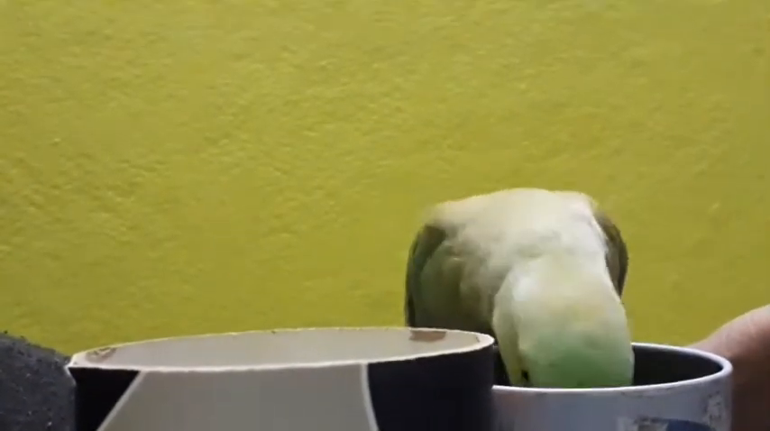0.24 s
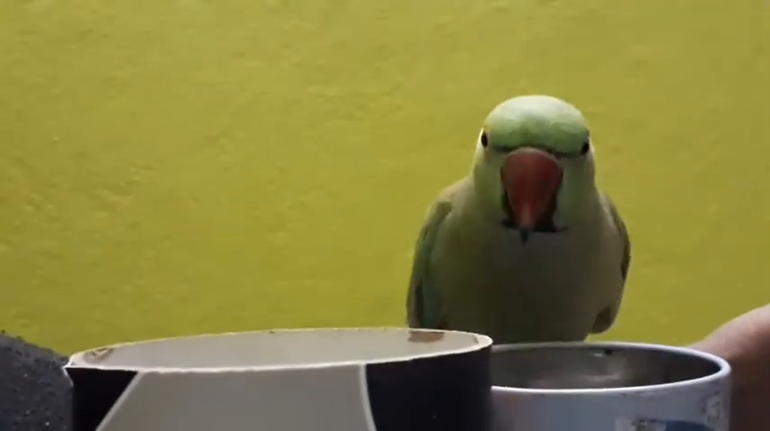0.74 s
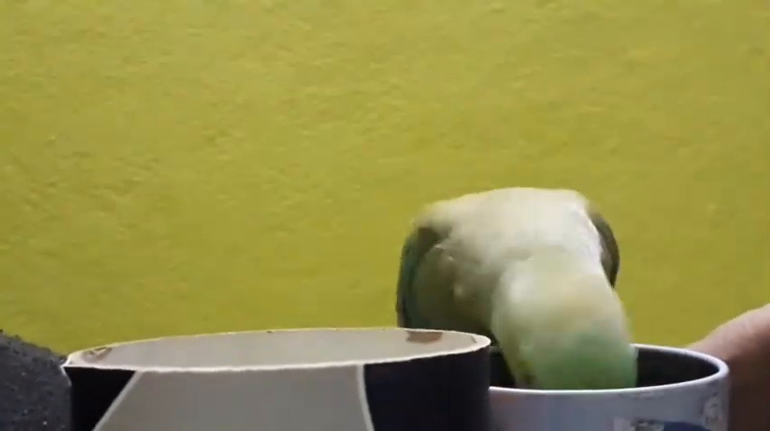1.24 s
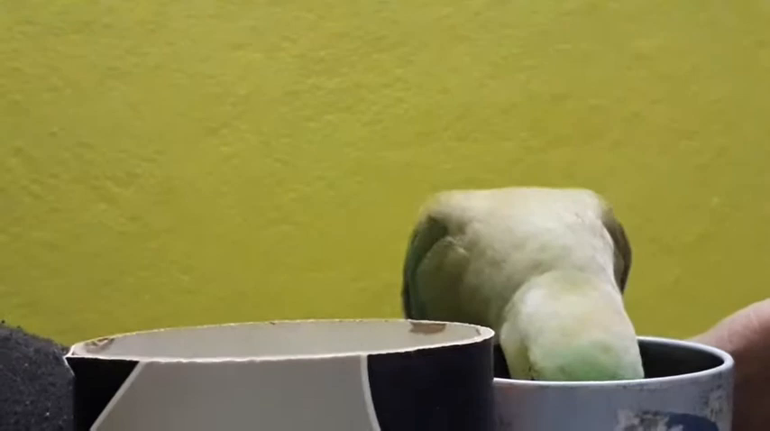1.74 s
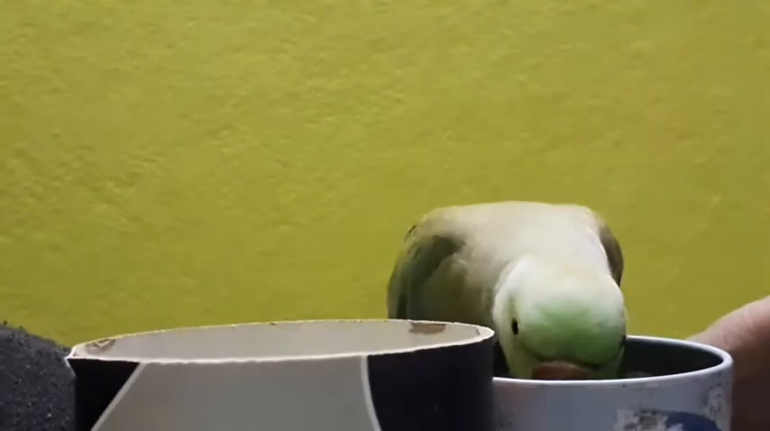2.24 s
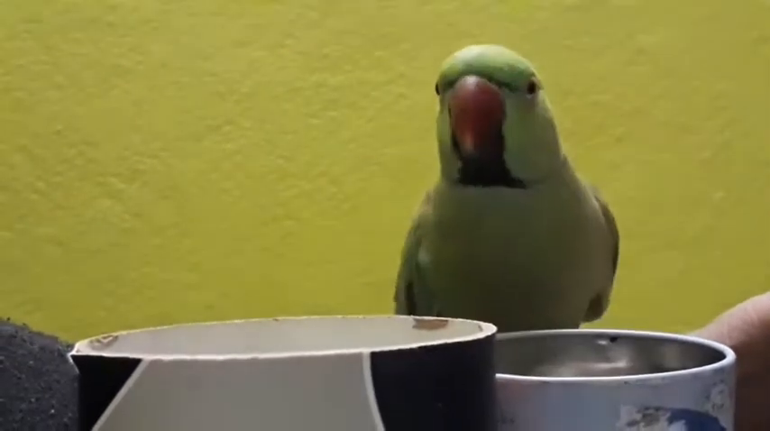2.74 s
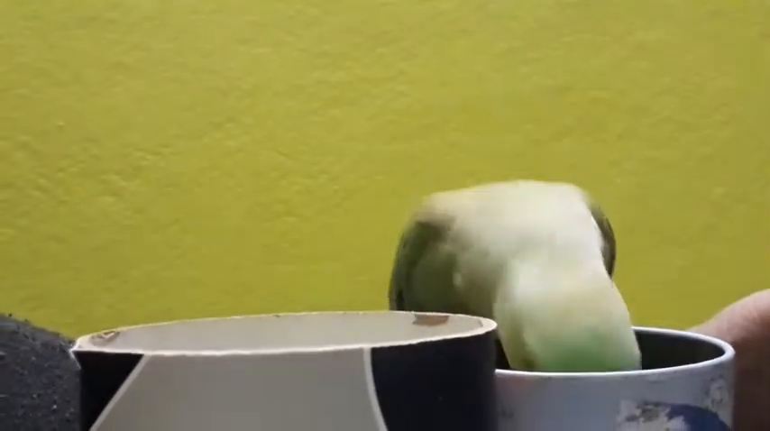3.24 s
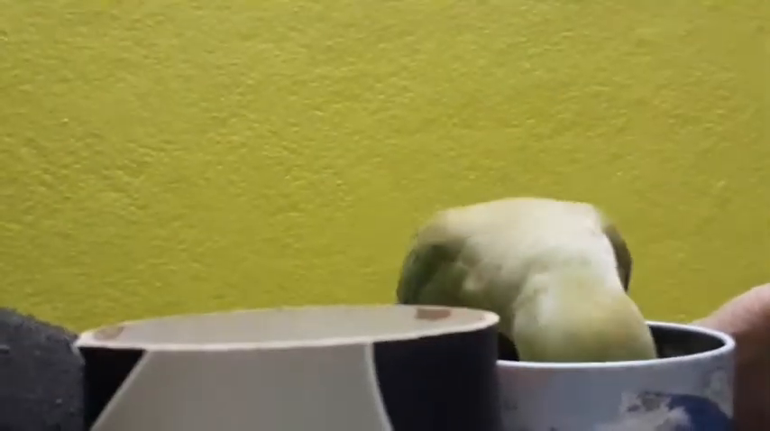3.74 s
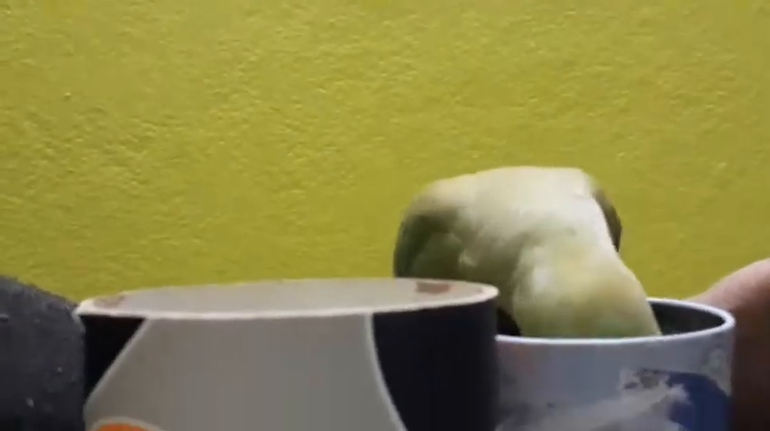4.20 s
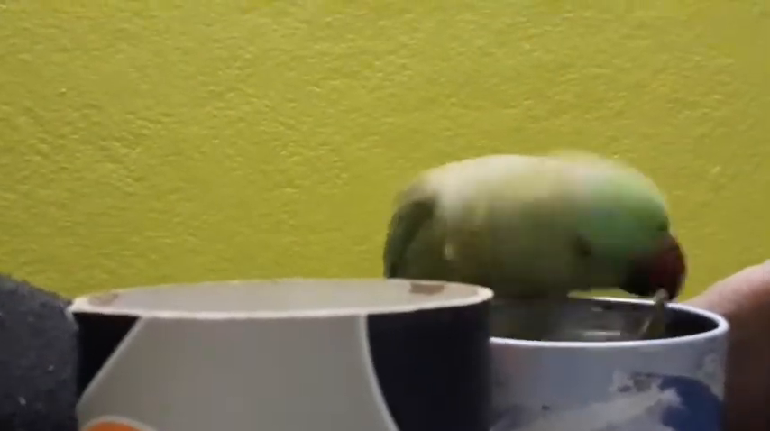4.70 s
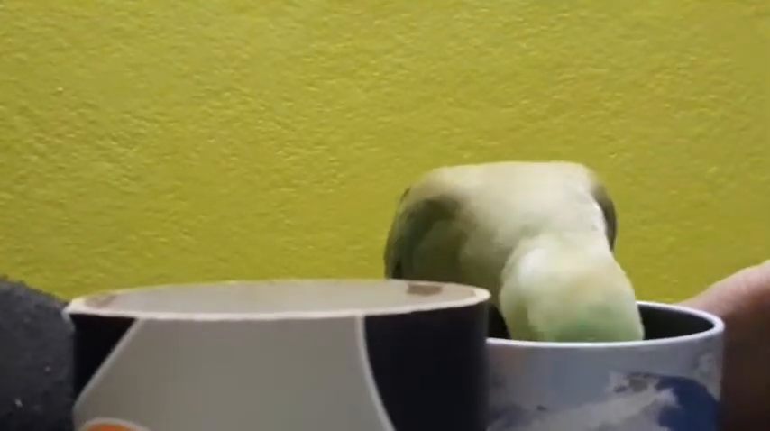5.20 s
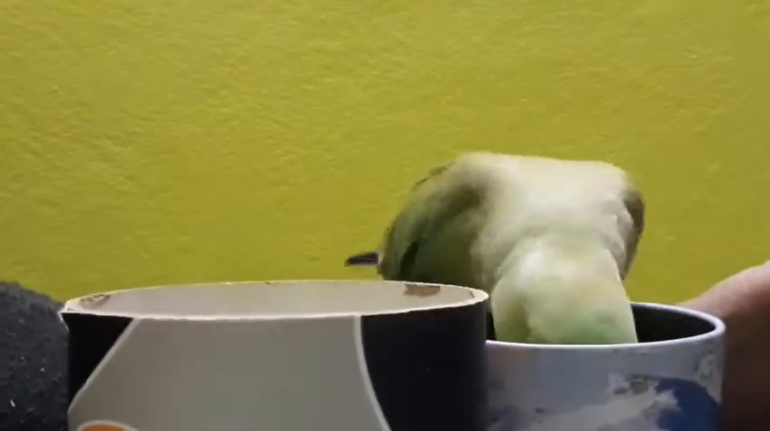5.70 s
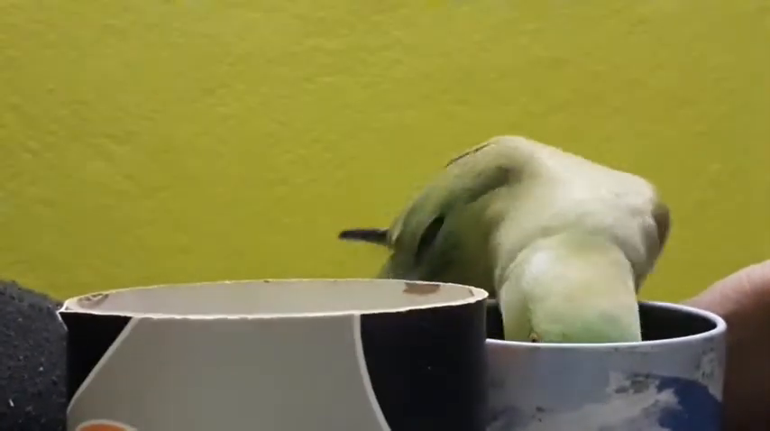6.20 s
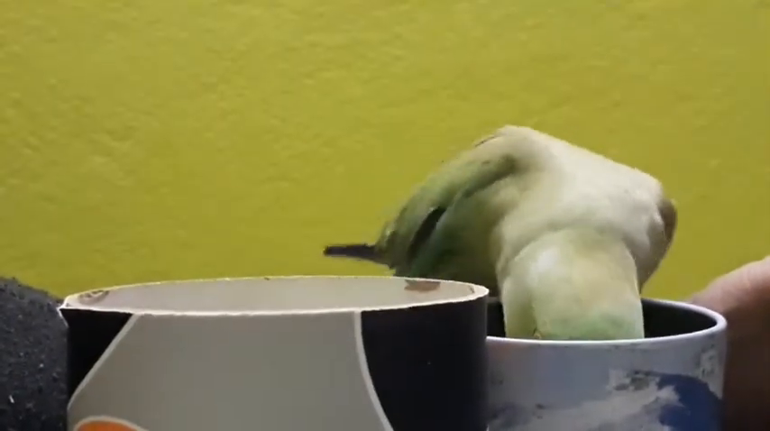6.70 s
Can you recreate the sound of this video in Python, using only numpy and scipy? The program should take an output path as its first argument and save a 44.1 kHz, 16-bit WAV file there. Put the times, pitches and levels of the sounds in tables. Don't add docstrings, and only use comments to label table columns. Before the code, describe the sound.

Coins clink, drag and jingle in a metal mug as a bird's beak digs, close up in a small hard room with distant traffic.

```python
import sys
import numpy as np
from scipy import signal
from scipy.fft import rfft, irfft
from scipy.io import wavfile
from scipy.ndimage import uniform_filter1d

SR = 44100
rng = np.random.default_rng(int(sys.argv[2]) if len(sys.argv) > 2 else 0)


def level_to_linear(level):
    exponent = np.asarray(level, float) / 20
    return 10 ** exponent


def pcm_store(signal):
    levels = np.round(np.clip(np.atleast_2d(signal), -1, 1) * 32767)
    wavfile.write(sys.argv[1], SR, levels.astype(np.int16).T)


N = 306495
T = np.arange(N) / SR
RIM_HZ = 6680
HEAD_IN_S = 4.3
# mode_hz, width_hz, level_db
MUG_MODES = [(920, 31, 11.5), (1922, 76, -8), (2730, 47, -14), (3750, 220, -1.5), (4640, 110, -7.5),
             (6050, 130, -20)]


def band(x, lo_hz, hi_hz, order=2):
    return signal.sosfilt(signal.butter(order, [lo_hz, min(hi_hz, .45 * SR)], "band", fs=SR, output="sos"), x)


def resonate(x, hz, width_hz):
    return signal.lfilter(*signal.iirpeak(hz, hz / width_hz, fs=SR), x)


def unit(x):
    return x / np.sqrt(np.mean(x ** 2))


def curves(table, silent_db=None):
    s, *columns = np.transpose(table)
    return [np.interp(T, s, c, silent_db, silent_db) for c in columns]


def walk(rate_hz):
    k = int(SR / rate_hz)
    held = np.repeat(rng.standard_normal(N // k + 1), k)
    return unit(uniform_filter1d(held, k)[:N])


def add(out, start_s, sound):
    i = int(start_s * SR)
    out[i:i + len(sound)] += sound[:N - i]


def decay(t_s, t60_s):
    return np.exp(-np.log(1000) * t_s / t60_s)


def engine(street_db, turn, puff):
    # tone_hz, level_db
    tones = [(60, -4.5), (137, 2.5), (190, -6.5), (226, -8), (287, -11.5), (398, -5), (535, -8.5),
             (630, -8), (765, -10), (950, -11.5)]
    # centre_hz, width_hz, level_db
    throat = [(1350, 80, -8), (2000, 45, -7), (2900, 150, 1.5), (3370, 680, -1), (3850, 300, -4),
              (5000, 250, -6.5)]
    throb = sum(level_to_linear(db + 1.2 * walk(8.4)) * np.sin(2 * np.pi * (hz * T + .15 * walk(7.5))) for hz, db in tones)
    gasp = uniform_filter1d(np.exp(-(((turn + 0.14) % 1) / 0.47) ** 3.1), 400)
    air = rng.standard_normal(N)
    wheeze = unit(band(sum(level_to_linear(db) * resonate(air, hz, w) for hz, w, db in throat), 1200, 5300, order=3))
    wheeze_db = -60 + 1.7 * street_db + walk(3.3) + 2.5 * walk(25)
    return level_to_linear(-54.5 + 1.2 * street_db) * puff * throb + level_to_linear(wheeze_db) * (0.36 + gasp) * wheeze


def motor(puff):
    # start_s, pitch_hz, level_db
    speed = [
        (0.0, 106.9, -68.5),
        (0.79, 102, -64.5),
        (1.2, 98.95, -70),
        (2.3, 91.67, -71.5),
        (3.3, 98.3, -75.5),
        (4.86, 93.8, -72.5),
        (6.1, 93.26, -57.5),
        (6.95, 95.77, -56),
    ]
    pitch_hz, level_db = curves(speed)
    swing = 1 - 0.54 * (1 - puff) * np.clip((T - 2.2) / 4.1, 0, 1)
    return level_to_linear(level_db) * np.sqrt(2) * swing * np.sin(2 * np.pi * np.cumsum(pitch_hz) / SR)


def traffic(street_db, puff):
    # pitch_hz, density_db_per_hz
    spectrum = [(18, -43.5), (35, -19.5), (91, -5.5), (230, -10.5), (737, -10), (1190, -22.5),
                (2500, -29.5), (3500, -78)]
    hz, shape = np.fft.rfftfreq(N, 1 / SR), np.transpose(spectrum)
    gain = level_to_linear(np.interp(np.log(hz + 1), np.log(shape[0]), shape[1]))
    rumble = irfft(rfft(rng.standard_normal(N)) * gain, N)
    rumble = rumble / np.std(band(rumble, 246.8, 640))
    heave_db = 3 * (puff - .8) * np.clip((T - 2.2) / 4.5, 0, 1)
    return level_to_linear(-60 + street_db + 2.5 * walk(12) + heave_db) * rumble


def outside():
    # start_s, level_db
    street = [(0.0, -4), (0.43, -5.5), (0.79, -2), (0.99, -15.5), (1.35, -17.5), (2.01, -16), (2.26, -9.5),
              (2.54, -14), (2.81, -4), (3.21, -16.5), (3.42, -7), (3.83, -16), (4.08, -7.5), (4.86, -1),
              (5.28, -4.5), (6.1, -1), (6.66, -1.5), (6.95, -0.5)]
    street_db = curves(street)[0]
    period_s, first_s = .1682, .043
    turn = (T - first_s) / period_s
    puff = (.5 + .5 * np.cos(2 * np.pi * turn)) ** 1.3
    return engine(street_db, turn, puff) + motor(puff) + traffic(street_db, puff)


def scuffs(slips):
    # start_s, rms_db, centre_hz, fade_s
    beak = [(0.318, -49.5, 1500, 0.034), (.396, -26.5, 11000, 0.017), (0.178, -57, 4600, 0.06),
            (.322, -47.5, 1250, 0.028), (.41, -44, 800, 0.029), (1.32, -64, 8500, 0.046),
            (2.31, -50, 1370, 0.047), (3.27, -57, 1398, 0.093), (3.304, -49, 5260, 0.23),
            (5, -51.5, 3200, 0.05), (5.698, -46.5, 3000, 0.012), (3.628, -48.5, 3600, 0.076),
            (4.15, -55.5, 4900, 0.1), (5.335, -49, 2170, 0.031), (6.43, -44.5, 4100, 0.03),
            (5.325, -48, 1250, 0.033), (6.31, -57, 1300, 0.049), (4.9, -52.5, 3400, 0.065),
            (5.71, -54, 3800, .07), (6.1, -50, 730, .015), (6.405, -54.5, 900, .04),
            (6.05, -59, 2700, 0.052), (6.235, -61, 3200, 0.065), (6.57, -65, 3500, 0.049),
            (5.415, -46, 2200, 0.015), (5.451, -42, 4500, .008), (4.788, -44, 12500, 0.043),
            (4.885, -41, 11000, 0.028), (4.941, -40, 13000, 0.022)]
    # start_s, rms_db, centre_hz, fade_s
    feathers = [(.394, -31.5, 730, 0.007), (5.405, -45, 2300, 0.04), (.315, -53, 7000, 0.06),
                (1.69, -52, 3800, 0.031), (1.315, -57, 2300, 0.06), (1.27, -64, 3500, 0.028),
                (2.727, -37, 1100, .03), (.637, -58, 3300, .045), (5.55, -57, 1500, .1),
                (6.6, -60, 1400, .2), (6.0, -60, 1500, .15), (2.04, -40, 3200, 0.14),
                (3.195, -55, 3700, 0.38), (.01, -59, 4200, 0.071), (6.402, -49.5, 2000, 0.053),
                (5.6, -55, 1100, 0.047)]
    # start_s, rms_db, centre_hz, fade_s
    quill = [(.402, -28, 2530, 0.013), (5.036, -52.5, 16000, 0.022), (5.168, -52.5, 16000, 0.027),
             (5.122, -59, 14300, .02), (.45, -51.5, 3300, 0.048), (3.2, -63, 3770, .04),
             (3.63, -53, 7350, 0.059), (5.95, -51.5, 3200, .06), (3.195, -57, 7500, .09),
             (3.3, -55, 7400, .07), (3.39, -52, 7500, .055), (3.5, -60, 7200, .04),
             (3.93, -63.5, 5400, 0.11), (4.129, -53, 7000, 0.033), (4.8, -46, 1295, 0.037),
             (2.9, -44, 6100, 0.016), (.4, -23, 2150, .007), (2.445, -36, 6200, .03),
             (4.942, -30, 6000, .02), (1.684, -56, 1800, .02), (1.325, -57, 1300, .045),
             (6.485, -40, 3600, 0.0055), (5.698, -42.5, 3700, 0.007)]
    # start_s, rms_db, centre_hz, fade_s
    whistle = [(.02, -59.5, 5100, .06), (.02, -67, 2600, 0.045), (.19, -65, 2450, 0.082),
               (3.29, -57, 1520, 0.099), (5.55, -53.5, 2960, 0.045), (5.55, -61, 5100, .04),
               (5.58, -64, 2000, .05), (5.715, -56, 3050, 0.076), (5.77, -61, 2040, 0.042),
               (6.06, -62, 2900, .05), (6.06, -62.5, 4930, 0.038), (6.235, -66, 4880, .04),
               (6.57, -65, 4950, .04), (6.74, -59.5, 2850, .05)]
    out, t = np.zeros(N), np.arange(SR // 2) / SR
    for table, octaves in (beak, 0.95), (feathers, 2.2), (quill, .38), (whistle, .16):
        half = 2 ** (octaves / 2)
        for s, db, hz, fade_s in table:
            rub = unit(band(slips[int(s * SR + hz):][:len(t)], hz / half, hz * half, order=3))
            fade = (1 - np.exp(-t / (0.16 * fade_s))) * np.exp(-t / fade_s) * np.cos(np.pi * t)
            add(out, s, level_to_linear(db) * fade * rub)
    return out


def scrape():
    # [(start_s, pressure_db)]
    spells = [
        ((-13.5, -17.5), [(0.28, -68), (0.378, -58), (0.42, -44)]),
        ((-2, 0), [(1.97, -82.5), (2.086, -52), (2.214, -39.5), (2.284, -60), (2.346, -63), (2.42, -63)]),
        ((-8, 0.81), [(3.19, -73), (3.262, -61), (3.402, -53), (3.5, -61), (3.56, -84)]),
        ((-26.5, -7.5), [(3.56, -72), (3.86, -72.5), (3.988, -83), (4.194, -63), (4.3, -69)]),
        ((-22.5, -6.5), [(4.3, -56.5), (4.522, -54), (4.64, -52.5), (4.8, -70), (4.88, -38.5), (5.002, -68), (5.194, -52.5), (5.308, -60), (5.55, -65)]),
    ]
    slips = rng.standard_normal(N + SR) * np.resize(level_to_linear(2.0 * walk(300) + walk(40)), N + SR)
    wall = sum(level_to_linear(db) * resonate(slips[:N], hz, 2.2 * w) for hz, w, db in MUG_MODES[2:])
    body = unit(band(wall + 0.69 * slips[:N], 1900, 0.86 * RIM_HZ, order=4))
    bright = unit(band(slips[::-1][:N], 5600, 15000))
    hollow = unit(band(slips[-N:], 700, 2100))
    out = scuffs(slips)
    for (bright_db, hollow_db), pressure in spells:
        pressure_db = curves(pressure, silent_db=-120)[0]
        out += level_to_linear(pressure_db) * (body + level_to_linear(bright_db) * bright + level_to_linear(hollow_db) * hollow)
    return out


def contact(start_s, peak_db, centre_hz, edge_db, thud_db, contact_ms):
    size = 4096
    t = np.arange(size) / SR
    slap, head_in = contact_ms < 1.1, start_s > HEAD_IN_S
    tau_s = contact_ms * 0.00063
    chatter = 0.034 * (1 - np.exp(-t / 0.0025)) * np.exp(-t / 0.029)
    push = rng.standard_normal(size) * ((t / tau_s) ** 0.31 * np.exp(-t / tau_s) + chatter)
    push[8] += 1.6
    wall = np.zeros(size)
    for hz, width_hz, db in MUG_MODES:
        luck, pull = rng.standard_normal(2)
        wall += level_to_linear(db + 3.0 * luck) * resonate(push, hz * (1 + 0.023 * pull), 1.3 * width_hz)
    spot = resonate(push, centre_hz, .38 * centre_hz)
    body = band(0.5 * wall + spot + 0.25 * push, 2400 if slap else 1700, 1.033 * RIM_HZ, order=5)
    base_hz = (230, 900) if slap else (600 if head_in else 430, 1700)
    thud = band(push, *base_hz)
    click = band(push, 10800 if head_in else 8000, 22000)
    parts = [(body, 0), (thud, thud_db), (click, edge_db + 11.0)]
    return sum(level_to_linear(peak_db + db) * p / np.abs(p).max() for p, db in parts)


def knocks():
    # start_s, peak_db, centre_hz, edge_db
    lift = [(0.3806, -34, 6270, -20), (0.3990, -5.5, 4194, -16), (0.635, -64.5, 3260, 4.5),
            (0.7111, -17.5, 3030, -10), (0.7228, -10.5, 3800, -9), (0.7307, -10.5, 3950, -5),
            (0.7462, -14, 6050, -7), (0.7863, -18.5, 7200, -4.5), (0.7915, -11, 3700, -5.5),
            (0.8218, -29, 3670, 1.5), (0.845, -14, 4870, -7), (0.8525, -17.5, 3923, -2)]
    # start_s, peak_db, centre_hz, edge_db
    peck = [(1.266, -56, 3670, -22), (1.2812, -49.5, 4620, -17), (1.3593, -40, 4870, -10.5),
            (1.3906, -51, 4500, -20), (1.595, -43, 4900, -14), (1.677, -47, 3990, -16),
            (1.683, -30, 4230, -20.5), (1.768, -44, 6000, -19), (1.8284, -56, 2360, -22.5),
            (1.8557, -49, 2356, -38), (1.9144, -58.5, 4730, -10.5), (1.9863, -48, 3860, -30)]
    # start_s, peak_db, centre_hz, edge_db
    drag = [(2.0467, -27, 4400, -22.5), (2.1167, -23.5, 6650, -13.5), (2.136, -19, 5900, -10.5),
            (2.147, -19, 5540, -10), (2.1516, -19.5, 3900, -9), (2.1845, -20, 5800, -11.5),
            (2.2116, -11, 3750, -9), (2.2224, -18, 6260, -10), (2.2463, -24.5, 3620, -12.5),
            (2.4028, -34, 5530, -20), (2.4142, -31, 4370, -9), (2.4195, -25.5, 4900, -12.5),
            (2.4428, -13, 5900, -9), (2.578, -58.5, 5000, -14.5)]
    # start_s, peak_db, centre_hz, edge_db
    settle = [
        (2.7432, -16, 6680, -33.5),
        (2.81, -21, 4600, -10),
        (2.8602, -25.5, 7150, -12.5),
        (2.8806, -30, 3900, -24),
        (2.9290, -41, 4130, 15.5),
    ]
    # start_s, peak_db, centre_hz
    probe = [(3.313, -36, 7240), (3.3716, -37, 5100), (3.4205, -33.5, 6540), (3.6055, -49.5, 7010),
             (3.7444, -46.5, 2920), (3.7942, -50.5, 5330), (3.8625, -46.5, 7000), (3.8711, -41.5, 5780),
             (4.1842, -40.5, 5800)]
    # start_s, peak_db, centre_hz
    dig = [(4.3353, -32, 3710), (4.3616, -29.5, 4500), (4.416, -25, 5800), (4.4393, -30.5, 5780),
           (4.459, -33.5, 5440), (4.475, -18.5, 5430), (4.5209, -31, 5410), (4.6146, -21, 4700),
           (4.6264, -28, 4970), (4.6398, -24.5, 5070), (4.6813, -32, 5000)]
    # start_s, peak_db, centre_hz, extra_edge_db
    clatter = [(4.7197, -11, 5770, -0.5), (4.7398, -7.5, 3560, -11.5), (4.7500, -4.5, 4750, -5.5),
               (4.788, -6, 5100, 2.5), (4.805, -5, 3830, -1.5), (4.8444, -20, 6060, -3),
               (4.872, -19.5, 5010, 10), (4.8854, -9, 4700, -7.5), (4.8963, -11.5, 4730, -5),
               (4.9133, -10.5, 4900, 0), (4.9401, -3, 4400, 1), (5.032, -20.5, 4560, 1)]
    # start_s, peak_db, centre_hz, extra_edge_db
    stir = [(5.1077, -39, 4670, -4), (5.1213, -29.5, 3930, 8), (5.1653, -21.5, 4600, 10),
            (5.2175, -30, 4540, -9), (5.256, -27, 4100, -6), (5.3467, -36, 2770, -4),
            (5.3644, -37, 2455, -7), (5.4515, -32.5, 3913, -16), (5.5114, -46, 4130, -5),
            (5.698, -40.5, 3610, -11), (5.869, -43, 3980, -1.5), (5.8758, -27, 4090, 6),
            (5.8863, -24.5, 3470, -4), (5.918, -28.5, 5000, 18), (5.9379, -31, 2650, 16),
            (6.486, -41, 3800, -8), (6.9316, -48, 3720, 1)]
    # start_s, peak_db, centre_hz, edge_db
    open_ticks = [(.3885, -31, 5200, -15), (.4045, -13, 6500, -10), (.265, -56, 4060, -12.5),
                  (.7405, -17.5, 4200, -5), (.7965, -17.5, 3592, -3.5), (1.5425, -69.5, 4000, -12),
                  (1.945, -57.5, 4500, -12), (1.963, -58, 4000, -17), (2.057, -28.5, 3440, -14),
                  (2.089, -38, 5560, -10), (2.1255, -31, 5740, -10), (2.1435, -21.5, 4500, -12),
                  (2.1555, -23.5, 4200, -12), (2.163, -34, 5500, -11.5), (2.1935, -32, 3720, -11),
                  (2.2085, -22, 4500, -9), (2.233, -28, 4480, -6), (2.8128, -18.5, 5000, -3.5),
                  (2.8628, -27, 5500, -7), (2.9268, -28.5, 4400, -10)]
    # start_s, peak_db, centre_hz
    deep_ticks = [(4.341, -38, 4500), (4.3725, -38, 2800), (4.4702, -33.5, 5800), (4.5268, -33, 5500),
                  (4.607, -38, 5500), (4.6305, -28, 5500), (4.6515, -36, 5200), (4.7795, -39, 4500),
                  (4.7865, -26, 4200), (4.879, -21, 4500), (4.8995, -10.5, 4800), (4.9435, -12, 4500),
                  (5.156, -37, 4500), (5.1885, -32, 2600), (5.2015, -33, 4500), (5.2305, -44, 4210),
                  (5.4115, -39, 4870), (5.4175, -32, 4000), (5.4235, -41, 4600), (5.427, -25.5, 4200),
                  (5.4335, -47, 4600), (5.4385, -45, 5000), (5.4585, -35, 4500), (5.9275, -34, 4200),
                  (6.436, -44, 5390), (6.448, -38, 3820)]
    # start_s, peak_db, centre_hz, edge_db, thud_db
    slaps = [
        (2.7254, -4.5, 4420, -6, -24),
        (2.729, -6, 4600, -12, -22.5),
        (2.8150, -15, 6500, -2.5, -14),
        (2.817, -20.5, 5300, -2, -16),
        (2.923, -24, 5000, 1, -20.5),
    ]
    # knocks, thud_db, contact_ms, shaded_edge_db
    bouts = [(lift, -20, 4, 0), (peck, -17.5, 3.1, 0), (drag, -17.5, 3.02, 0), (settle, -16, 2.7, 0),
             (probe, -13, 2.8, -28.5), (dig, -18.5, 3.45, -32), (clatter, -20, 3.56, -28.5),
             (stir, -13, 3.3, -39.5), (open_ticks, -18.5, 1.7, 0), (deep_ticks, -16.5, 1.5, -39)]
    rows = [(*slap, 0.24) for slap in slaps]
    for table, thud_db, contact_ms, shade_db in bouts:
        for s, db, hz, *edge_db in table:
            rows.append((s, db, hz, sum(edge_db) + shade_db, thud_db, contact_ms))
    out = np.zeros(N)
    for row in rows:
        add(out, row[0] + 0.00043, contact(*row))
    return out


def thumps():
    # start_s, peak_db, mode_hz, t60_s
    landings = [(.396, -37, 190, 0.033), (.4, -36.5, 705, .04), (.819, -48, 290, .05),
                (2.15, -42, 560, .06), (2.185, -38, 1000, .03), (2.7255, -25.5, 324, 0.043),
                (2.7275, -25.5, 620, 0.039), (2.742, -37, 300, 0.088), (2.772, -42.5, 300, .1),
                (2.8115, -31, 442, 0.048), (2.812, -39, 230, 0.05), (2.862, -41, 555, .05),
                (2.926, -40.5, 774, 0.048), (2.927, -42, 430, 0.078), (3.38, -58, 210, .2),
                (4.427, -48, 275, 0.053), (4.939, -41, 290, .06)]
    out, t = np.zeros(N), np.arange(SR // 4) / SR
    for s, db, hz, t60_s in landings:
        add(out, s, level_to_linear(db) * (1 - np.exp(-t / .0008)) * decay(t, t60_s) * np.sin(2 * np.pi * hz * t))
    return out


def rings(table, hz, caught_s):
    split_hz, twin_db = 110, -6
    hang_s = .7
    out, rock = np.zeros(N), np.resize(walk(150), N + SR)
    t = np.arange(int(.4 * SR)) / SR
    stops_s = np.sort([row[0] for row in table] + caught_s + [N])
    for s, db, t60_s in table:
        luck = rng.random(4)
        left_s = stops_s[stops_s > s + .003][0] - s
        tumble = 1 if s > hang_s else .1
        i = int(s * SR)
        sway = .8 * tumble * rock[i + SR // 2:][:len(t)]
        fade = decay(t, t60_s) * decay(np.maximum(t - left_s, 0), 0.036)
        twin_hz = hz - split_hz * (.9 + .25 * luck[0])
        twin = level_to_linear(twin_db + 1.5 - 3.0 * luck[2]) * np.sin(2 * np.pi * (twin_hz * t + .25 + 0.18 * luck[1]))
        third_hz = hz + split_hz * (0.81 + luck[3])
        third = level_to_linear(twin_db - 11) * np.sin(2 * np.pi * (third_hz * t + luck[0]))
        tone = np.sin(2 * np.pi * hz * t + sway) + tumble * (twin + third)
        tone = tone * level_to_linear(1.6 * tumble * rock[i:][:len(t)])
        add(out, s, level_to_linear(db - 3.0) * (1 - np.exp(-t / 0.00054)) * fade * tone)
    return out


def ringing_coins():
    # start_s, peak_db, t60_s
    thick_low = [(0.636, -51, 0.3), (0.7124, -14, 0.19), (0.7494, -17.5, 0.3), (2.154, -21.5, .035),
                 (2.7252, -25.5, 0.17), (2.7442, -24, 0.24), (2.814, -20.5, 0.1), (2.862, -27.5, 0.39),
                 (2.9292, -30, 0.18)]
    # start_s, peak_db, t60_s
    thick_high = [(0.6336, -48, 0.49), (0.7115, -9, 0.18), (0.7331, -17, .2), (0.7848, -22, .13),
                  (2.7248, -6, 0.15), (2.813, -21, 0.27), (2.9295, -14, 0.07), (5.92, -38, .06)]
    # start_s, peak_db, t60_s
    wide_low = [(2.222, -29, .14), (2.4428, -21, 0.03), (2.452, -37, .15), (4.8994, -28, .2),
                (4.9412, -28, 0.2)]
    # start_s, peak_db, t60_s
    wide_high = [(2.22, -30, 0.12), (2.4428, -31, .09), (4.7589, -40, .1), (4.805, -17, 0.2),
                 (4.8854, -25, 0.15), (4.912, -25, .2), (4.9429, -17, .19)]
    # start_s, peak_db, t60_s
    bent_low = [(1.2694, -66, 0.17), (1.3608, -52.5, 0.12), (1.5943, -54, 0.13), (1.7689, -63, 0.19)]
    # start_s, peak_db, t60_s
    bent_high = [(1.36, -62, .19), (1.5948, -55, 0.15), (1.7684, -71, .098)]
    # start_s, peak_db, t60_s
    thin_low = [(4.418, -44, 0.022), (4.4755, -31, .03), (4.6304, -40.5, 0.15), (4.79, -23.5, 0.087)]
    # start_s, peak_db, t60_s
    thin_high = [(4.6282, -30, .05), (4.786, -23, .2), (4.81, -26, .15)]
    caught_low_s = [.788, 2.165, 2.455, 4.805, 5.02]
    caught_high_s = [.845, 2.24, 4.649, 4.872, 5.025]
    purse = [(thick_low, thick_high, 9140, 15150), (wide_low, wide_high, 8980, 14200),
             (bent_low, bent_high, 9400, 14450), (thin_low, thin_high, 9280, 15400)]
    out = np.zeros(N)
    for low, high, low_hz, high_hz in purse:
        out += rings(low, low_hz, caught_low_s) + rings(high, high_hz, caught_high_s)
    return level_to_linear(-9 * (T > HEAD_IN_S)) * out


def room(x):
    t60_s, tail_db, dull_hz = 0.2, -9, 10000
    t = np.arange(int(.5 * SR)) / SR
    fade = decay(t, t60_s) * (1 - np.exp(-(t / .003) ** 2))
    noise = rng.standard_normal(len(t))
    dull = band(noise, 300, dull_hz, order=1)
    tail = fade * (dull + (noise - dull) * np.exp(-t / .1))
    return x + level_to_linear(tail_db) * signal.fftconvolve(x, tail / np.sqrt(np.sum(tail ** 2)))[:N]


def scene():
    far, rubs, hits, shelf, ringing = outside(), scrape(), knocks(), thumps(), ringing_coins()
    wet = .5
    coins = room(hits + wet * ringing) + (1 - wet) * ringing
    noise = rng.standard_normal(N)
    hiss = level_to_linear(-77.5) * (noise + 0.48 * resonate(noise, 3600, 1600))
    mono = coins + shelf + rubs + far + hiss
    side = level_to_linear(-15) * band(hits * rng.standard_normal(N), 4700, 13500, order=5)
    side = side + level_to_linear(-85) * band(rng.standard_normal(N), 4000, 16000)
    side = side + level_to_linear(-35.5) * walk(30) * band(mono, 25, 2400, order=1)
    return np.array([mono + side, mono - side])


def low_pass(x):
    return signal.sosfilt(signal.butter(12, 16800, fs=SR, output="sos"), x)


def record(dry):
    x = band(np.tanh(dry * .4) / .4, 40, 19000)
    x = signal.sosfilt(signal.ellip(6, .5, 35, 15700, fs=SR, output="sos"), x)
    return low_pass(x)


dry = scene()
out = record(dry)
pcm_store(out)
```